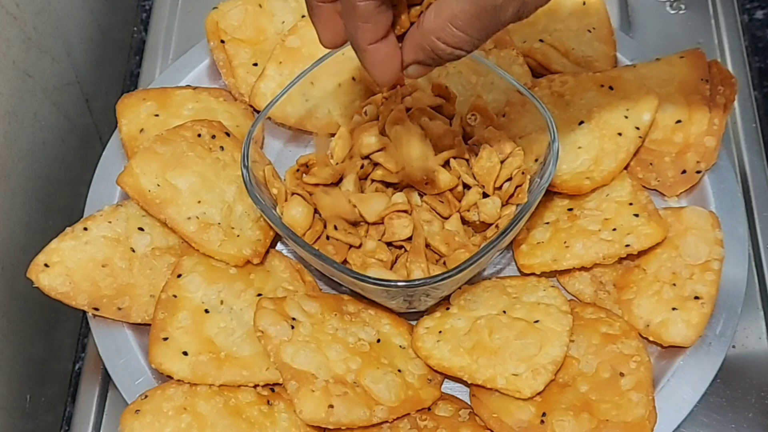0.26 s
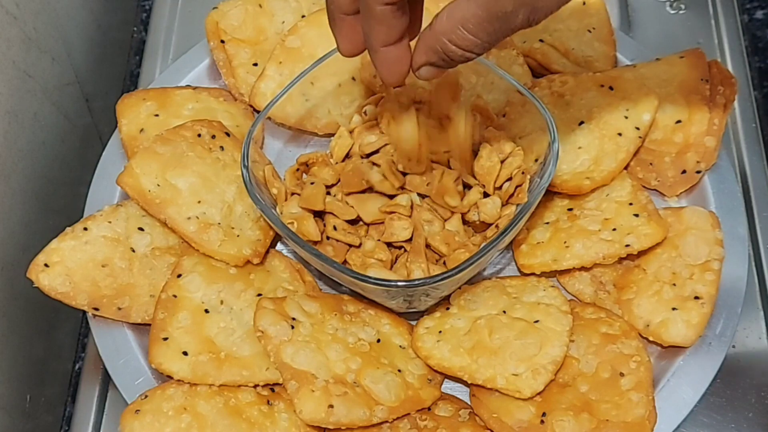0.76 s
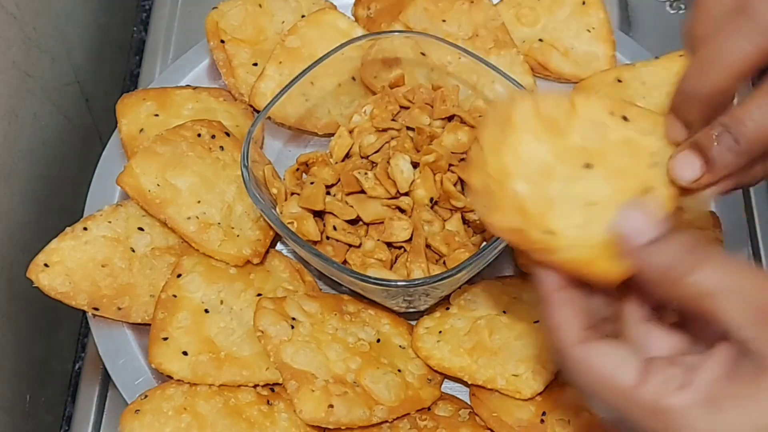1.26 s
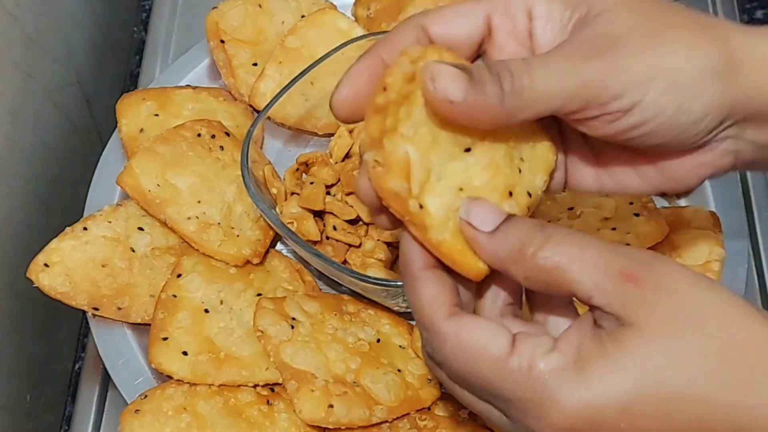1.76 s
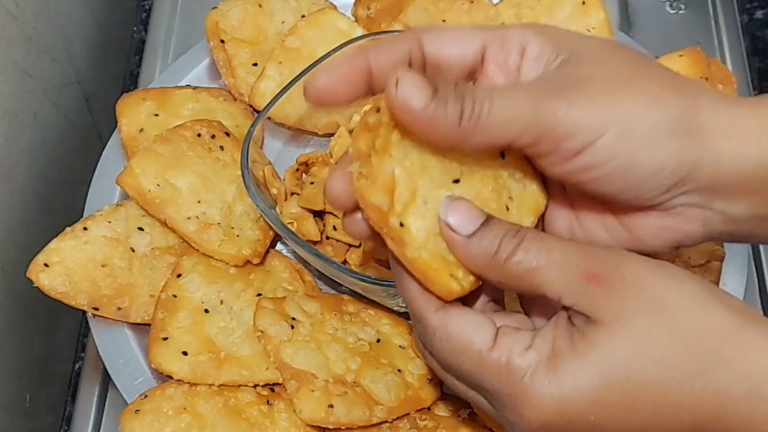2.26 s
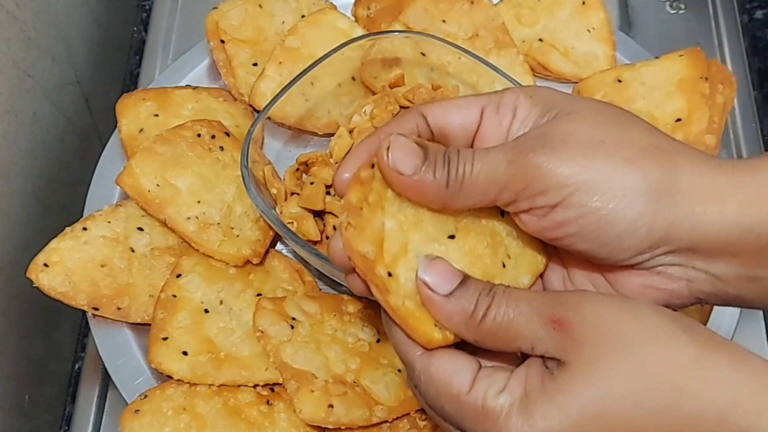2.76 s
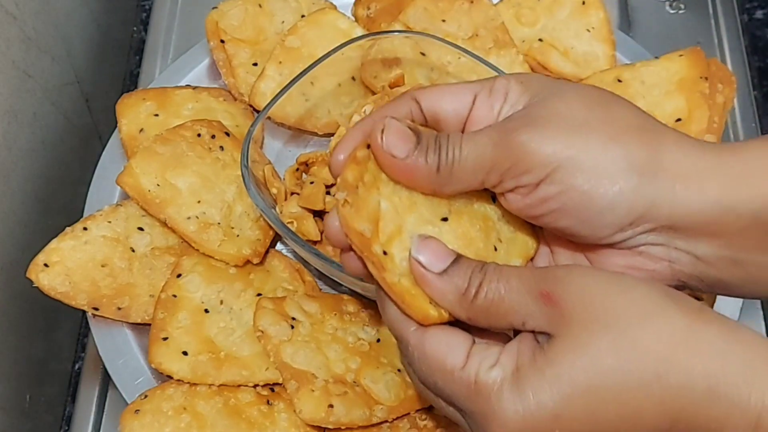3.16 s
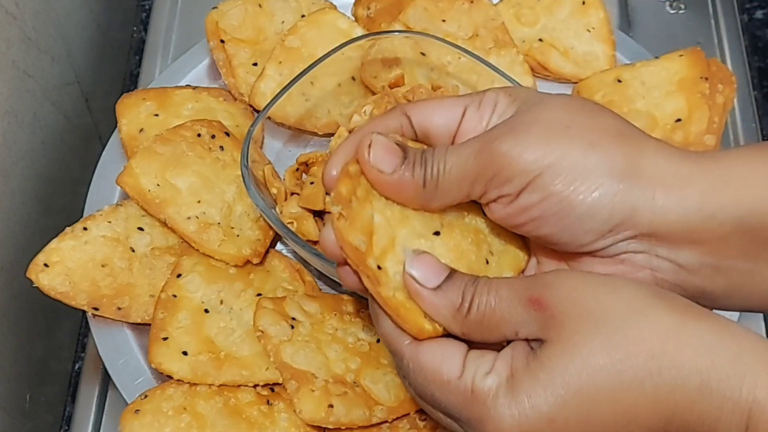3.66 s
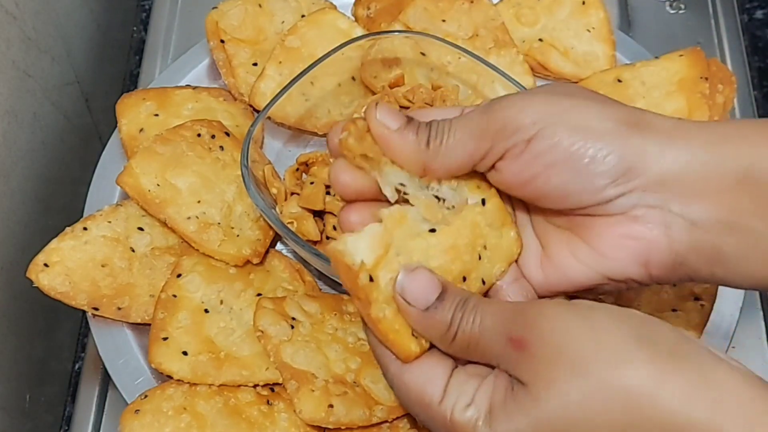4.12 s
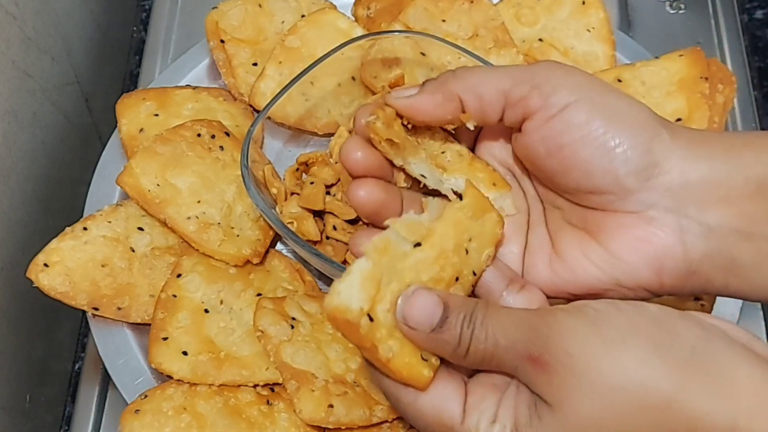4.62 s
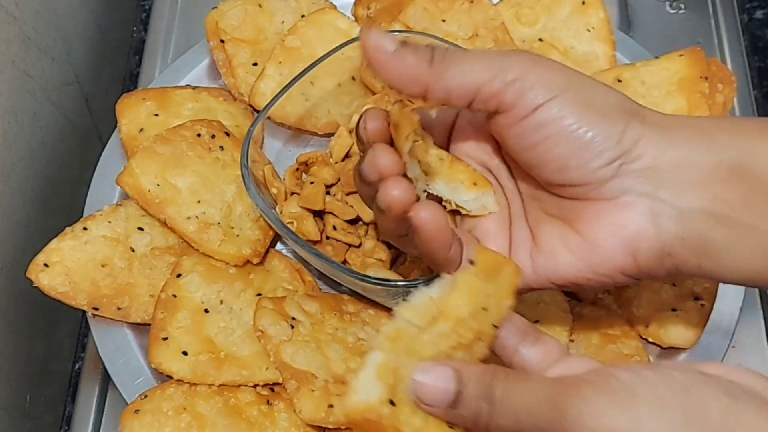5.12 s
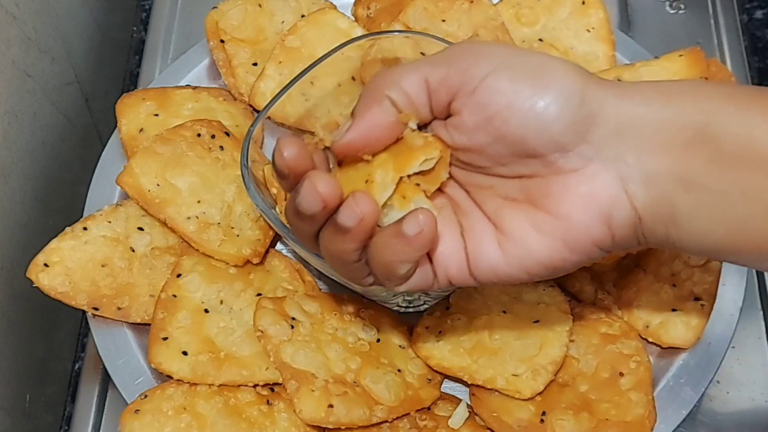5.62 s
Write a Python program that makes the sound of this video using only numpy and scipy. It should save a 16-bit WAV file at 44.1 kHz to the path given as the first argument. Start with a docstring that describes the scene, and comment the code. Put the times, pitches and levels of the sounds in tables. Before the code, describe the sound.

Heard up close in a small, slightly reverberant kitchen, dry snack pieces sprinkle into a glass bowl with bright little clinks. A faint rasp of fingers on crust follows. Then a fried cracker starts to crackle and breaks with three loud snaps, ending in soft, gritty crumbling and the light tap of a falling bit. A low rumble and faint appliance hum lie underneath.

```python
"""A glass bowl clinks as crisp fried snacks patter into it, each impact exciting its normal modes.
Two hands then rub a flaky cracker (stick-slip friction) and bend it until it snaps in three big
cracks (brittle fracture); one fist crumbles a piece, and a bit drops on the heap.
A close stereo microphone hears this in a small, hard, reverberant kitchen over a low rumble."""
import sys
import numpy as np
from scipy import signal
from scipy.fft import rfft, irfft, next_fast_len
from scipy.io import wavfile
from scipy.ndimage import uniform_filter1d, map_coordinates

SR = 44100
rng = np.random.default_rng(int(sys.argv[2]) if len(sys.argv) > 2 else 0)


def unload_audio(sound):
    """Save the sound as a 16-bit wav file, at the path given as the first command line argument."""
    columns = np.transpose(np.atleast_2d(sound))
    # keep every value between -1 and 1, then stretch to whole-number steps
    steps = np.round(np.clip(columns, -1, 1) * 32767)
    wavfile.write(sys.argv[1], SR, steps.astype(np.int16))


N = 259605

# heavily damped modes of the cracker: f/Hz, bandwidth/Hz, level/dB
CRACKER_MODES = [(1424, 590, -8), (2390, 420, 4.5), (3730, 600, -1.5)]
# spectrum of flying grit: f/Hz, level/dB
GRIT_SPECTRUM = [(1500, -35), (3200, -15), (5000, 5), (7500, 0), (11000, 0.5), (15500, -0.5)]
def fracture(snap_db, grit_db, run_ms):
    """Brittle fracture: a crack crosses the layers in tiny jerks that ring the cracker and spit grit."""
    t = np.arange(SR // 50) / SR
    run_s = run_ms / 1000
    stress = amp(-5 * t / run_s - 60 * np.maximum(t - run_s, 0) / .005)
    jerks = (stress + amp(-20 - 60 * t / .03)) * amp(2.5 * rng.standard_normal(len(t)))
    # quiet, gritty breaks are small flakes, which ring up to about an octave higher
    smallness = max(-snap_db - 17.5, 0) / 60 + max(grit_db - snap_db - 1.5, 0) / 16
    shift = 2 ** (min(smallness, 1) + rng.normal(0, 0.11))
    snap = resonate(jerks * stereo_noise(len(t), alike=0.91), CRACKER_MODES, shift)
    bass_cut = signal.butter(2, 850 * shift, "high", fs=SR, output="sos")  # a thin flake sheds no bass
    snap = unit(signal.sosfilt(bass_cut, snap))
    grit = coloured(jerks * stereo_noise(len(t), alike=0.082), GRIT_SPECTRUM)
    energy_scale = np.sqrt(SR / 1000 / len(t))  # levels are the burst's energy as rms over 1 ms
    return energy_scale * (amp(snap_db) * snap + amp(grit_db) * grit)


# distinct fractures and dry contacts: t/s, snap level/dB, grit level/dB, run time/ms
CRACKS = [(0.0532, -28, -22, 1.9), (0.1735, -36.5, -32, 0.87), (0.1827, -26.5, -24.5, 0.8),
          (0.2681, -37, -23, 1.5), (0.5236, -52, -44, 1.4), (0.638, -50, -42, 1.6),
          (0.6775, -34, -28.5, 1.5), (0.6813, -33.5, -28.5, 1.5), (0.7132, -34, -27.5, 1.2),
          (0.7396, -37.5, -28.5, 1.1), (0.7553, -29, -22.5, 1.5), (2.5416, -59, -38.5, 1.3),
          (2.5547, -45, -41.5, 1.2), (2.6804, -60, -46.5, 1.2), (2.7433, -41, -37.5, 1.2),
          (2.9106, -51.5, -38, 1.2), (2.9754, -59, -40, 1.4), (2.9796, -35, -23, 0.6),
          (3.0016, -49.5, -27.5, 1.5), (3.0068, -23.5, -18, 1.7), (3.011, -10, -11.5, 4.5),
          (3.1478, -21, -29, 1.2), (3.156, -26, -28.5, 1.2), (3.1973, -28, -33.5, 1.4),
          (3.3203, -48.5, -29, 1.5), (3.409, -37.5, -42.5, 2.3), (3.4695, -27, -23.5, 0.93),
          (3.5314, -26, -26.5, 2.5), (3.5652, -7, -10, 3.0), (3.5753, -18, -15.5, 5.9),
          (3.6054, -22.5, -18, 0.8), (3.6816, -6, -6, 6.7), (3.7149, -19, -25, 1.5),
          (3.7364, -18, -28.5, 0.57), (3.838, -23.5, -35.5, 0.99), (3.864, -27.5, -25.5, 1.8),
          (3.9779, -52.5, -40, 1.2), (4.7967, -71, -42.5, 1.2), (4.8302, -62.5, -40, 4.0),
          (5.06, -37, -44.5, 4.0), (5.379, -39.5, -31.5, 1), (5.4055, -42.5, -30, 1.2),
          (5.6458, -37.5, -34.5, 5.4), (5.7086, -40.5, -30, 1.2), (5.797, -35, -29, 1.2),
          (5.8409, -27.5, -18.5, 5.5), (5.8644, -49, -29.5, 1.2)]
def cracks():
    """Sudden release of elastic energy radiates a transient, from dry taps to the three big breaks."""
    out = np.zeros((2, N))
    for start, snap_db, grit_db, run_ms in CRACKS:
        add(out, start, fracture(snap_db, grit_db, run_ms))
    return out


# pushes that bend the cracker: t/s, rise/s, hold/s, crunch level/dB, grit level/dB
BENDS = [(2.555, 0.1, 0.015, -65.5, -57.5), (2.682, 0.039, 0.02, -65, -59.5),
         (2.745, 0.05, 0.04, -64.5, -63.5), (2.885, 0.07, 0.015, -55.5, -53.5),
         (3.0, 0.04, 0.07, -51.5, -47.5), (3.165, 0.021, 0.03, -49, -50), (3.33, 0.06, 0.012, -52, -53.5),
         (3.41, 0.06, 0.02, -57, -62.5), (3.53, 0.1, 0.08, -41.5, -40.5), (3.705, 0.039, 0.038, -34.5, -37),
         (3.85, 0.046, 0.025, -43, -42), (4.04, 0.042, 0.03, -53.5, -56), (4.18, 0.1, 0.024, -65.5, -63),
         (4.285, 0.035, 0.005, -75, -67)]
# spectrum of yielding flakes: f/Hz, level/dB
CRUNCH_SPECTRUM = [(500, -20.5), (1200, -11), (2400, 2), (3800, 1.5), (5500, -19), (9000, -32)]
def bending():
    """Acoustic emission: flakes give way under bending stress. Returns the sound and both envelopes."""
    crunch_gain = envelope(BENDS, fall_db_per_s=233)
    grit_gain = envelope(BENDS, fall_db_per_s=167.5, level_column=1)
    crunch = crunch_gain * coloured(grains(per_s=1500, spread_db=2.5, alike=0.89), CRUNCH_SPECTRUM)
    grit = grit_gain * coloured(grains(per_s=1400, spread_db=2.0, alike=0.15), GRIT_SPECTRUM)
    return crunch + grit, crunch_gain, grit_gain


# squeezes of the closing fist: t/s, rise/s, hold/s, level/dB
SQUEEZES = [(4.655, 0.04, 0.01, -56), (4.714, 0.023, 0.0043, -62), (4.835, 0.03, 0.0074, -61),
            (5.21, 0.15, 0.031, -52.5), (5.4, 0.18, 0.039, -49), (5.655, 0.097, 0.023, -52),
            (5.735, 0.056, 0.02, -50.5), (5.81, 0.08, 0.08, -49.5)]
# spectrum of fine crumbs: f/Hz, level/dB
CRUMB_SPECTRUM = [(880, -17), (1500, -14.5), (2040, -22), (2610, -3.5), (3090, -3.5), (4420, -7),
                  (6060, -2.5), (9370, -8), (15100, -4.5), (16000, -6.5)]
def crumbling():
    """Compression grinds crumbs into a dense train of impulses. Returns the sound and its envelope."""
    gain = envelope(SQUEEZES, fall_db_per_s=145.5)
    return gain * coloured(grains(per_s=1700, spread_db=2.0, alike=0.22), CRUMB_SPECTRUM), gain


def chips(crunch_gain, grit_gain, per_s=23, spread_db=2.5):
    """A Poisson process: small flakes break off by chance, their levels following the two envelopes."""
    out = np.zeros((2, N))
    onsets = np.flatnonzero(rng.random(N) < per_s / SR)
    for i, luck_db in zip(onsets, spread_db * rng.standard_normal(N)[onsets]):
        snap_db, grit_db = 20 * np.log10([crunch_gain[i] + 1e-6, grit_gain[i] + 1e-6]) + luck_db
        if grit_db > -72:
            add(out, i / SR, fracture(snap_db + 11, grit_db + 13, run_ms=1.2))
    return out


# finger strokes: t/s, rise/s, hold/s, level/dB
STROKES = [(1.222, 0.018, 0.015, -51), (1.245, 0.015, 0.0034, -44), (1.318, 0.006, 0.002, -59),
           (1.65, 0.012, 0.0051, -64.5), (1.775, 0.053, 0.043, -61), (1.865, 0.06, 0.036, -54),
           (2.02, 0.23, 0.1, -67.5), (2.147, 0.04, 0.014, -52), (2.246, 0.014, 0.025, -53),
           (2.31, 0.06, 0.04, -63.5)]
# spectrum of the rubbed crust: f/Hz, level/dB
CRUST_SPECTRUM = [(710, -60), (1200, -17), (1540, -17), (1750, -12.5), (2230, -13.5), (3830, 2), (6870, -1),
                  (7490, -7), (14000, -14.5), (16000, -17)]
def rubbing():
    """Friction noise: skin rasps over the rough crust in thousands of tiny slips a second."""
    slips = grains(per_s=7600, spread_db=3.5, alike=0.28)
    return envelope(STROKES, fall_db_per_s=344) * coloured(slips, CRUST_SPECTRUM)


# jolts of the hands: t/s, level/dB
JOLTS = [(3.011, -47), (3.567, -53.5), (3.683, -53)]
def hand_jolts(t60_s=0.38):
    """Recoil: the hands jolt softly as the cracker gives, each time a decaying burst of noise."""
    out, t = np.zeros((2, N)), np.arange(SR // 4) / SR
    spectrum = [(100, -15.5), (320, -3.5), (490, -10.5), (850, 3.5), (2500, -18.5), (6000, -30.5)]
    for start, db in JOLTS:
        push = coloured(stereo_noise(len(t), alike=.9), spectrum)
        add(out, start, amp(db - 60 * t / t60_s) * push)
    return out


# normal modes of the glass bowl: f/Hz, level/dB, T60/s
BOWL_MODES = [(1926, -1, 0.32), (3258, 0.5, 0.21), (4744, 1, 0.21), (5290, 0, 0.15), (7180, 2.5, 0.19),
              (8468, -12.5, 0.08), (10200, -5, 0.15), (10700, -19, .18), (12710, -14, .22),
              (13270, -15.5, 0.14), (13800, -13, 0.12), (15200, -17, .17)]
# impacts, whose spot weights the modes: t/s, level/dB of modes 1, 2, 3, 4, level/dB of all higher modes
CLINKS = [(0.0, -42.5, -47, -37, -34.5, -48.5), (0.0539, -33.5, -28, -46.5, -31, -66),
          (0.23, -47.5, -30.5, -47.5, -58.5, -53), (0.288, -38.5, -22.5, -25, -43.5, -34.5),
          (0.3064, -32.5, -26.5, -45, -29, -46.5), (0.372, -43, -38, -44.5, -42, -47),
          (0.724, -53, -35, -44, -38, -59), (0.78, -48, -45, -41.5, -52, -55),
          (0.829, -53, -47, -53, -60, -68)]
def bowl(damped_share=0.35, damping_s=0.022):
    """Modal vibration: struck glass rings, and the heap pressing on it soaks up a share of each ring."""
    out, t = np.zeros((2, N)), np.arange(SR // 2) / SR
    attack = 1 - np.exp(-t / 0.00048)
    shape = attack * (1 - damped_share + damped_share * np.exp(-t / damping_s))
    for k, (hz, db, t60) in enumerate(BOWL_MODES):
        swing = np.zeros(N)
        for start, *levels in CLINKS:
            strike_db = levels[min(k, len(levels) - 1)]
            add(swing, start, amp(db + strike_db - 60 * t / t60) * shape)
        ringing = np.flatnonzero(swing)
        waver = np.array([wobble(per_s=45)[ringing] for port in range(2)])  # differs left and right
        phase = 2 * np.pi * hz * ringing / SR + .8 * waver[::-1]
        out[:, ringing] += swing[ringing] * amp(2.4 * waver) * np.sin(phase)
    return out * amp([[-1], [2]])  # louder on the right


# handfuls landing on the heap: t/s, rise/s, hold/s, patter level/dB, thud level/dB
HANDFULS = [(0.0, 0.02, 0.03, -46.5, -60.5), (0.06, 0.018, 0.012, -41, -51.5),
            (0.186, 0.038, 0.049, -47.5, -58.5), (0.275, 0.066, 0.073, -43.5, -55),
            (0.685, 0.055, 0.04, -45.5, -48.5), (0.745, 0.054, 0.041, -37.5, -44.5)]
# spectrum of the struck heap: f/Hz, level/dB
HEAP_SPECTRUM = [(290, -40), (500, -15.5), (1090, -15.5), (1950, -4.5), (2850, -9), (3340, 1), (3980, -9.5),
                 (5390, -9), (5880, -9), (16000, -17.5)]
# modes of the loaded plate under the bowl: f/Hz, bandwidth/Hz, level/dB
PLATE_MODES = [(340.6, 56, -4.5), (458.4, 30, -2), (744, 130, -16)]
def sprinkling():
    """Impact noise: pieces patter on the heap and drive the plate into forced vibration."""
    patter_gain = envelope(HANDFULS, fall_db_per_s=272)
    thud_gain = envelope(HANDFULS, fall_db_per_s=217.5, level_column=1)
    patter = coloured(grains(per_s=1800, spread_db=2.6, alike=.4), HEAP_SPECTRUM)
    thud = resonate(grains(per_s=600, spread_db=1.5, alike=.85), PLATE_MODES)
    return patter_gain * patter + thud_gain * thud


# a broken bit landing: t/s, plate level/dB, rattle level/dB
DROPS = [(5.061, -50.5, -54)]
def falling_bit():
    """Exponential decay after an impact: a falling bit knocks the plate and stirs the heap."""
    out, t = np.zeros((2, N)), np.arange(SR // 2) / SR
    for start, plate_db, rattle_db in DROPS:
        knock = resonate(stereo_noise(len(t), alike=0.48), PLATE_MODES)
        rattle = coloured(stereo_noise(len(t), alike=0.7), CRUNCH_SPECTRUM)
        add(out, start, knock * amp(plate_db - 60 * t / 0.44) + rattle * amp(rattle_db - 60 * t / 0.43))
    return out


# course of the background rumble: t/s, level/dB
RUMBLE_LEVELS = [(0.0, -46), (0.18, -56.5), (0.39, -50.5), (1.0, -55.5), (1.13, -66.5), (1.34, -62),
                 (3.01, -58.5), (3.86, -54.5), (4.21, -62.5), (5.14, -56), (5.78, -55.5), (5.88, -49)]
# its spectrum: f/Hz, level/dB
RUMBLE_SPECTRUM = [(20, -52.5), (35, -34), (50, -18.5), (62, 2), (80, -6), (115, 1), (160, -7.5), (200, -7),
                   (260, -14.5), (400, -21), (700, -45), (1500, -78.5)]
def rumble(waver_db=1.14):
    """Amplitude modulation: low-frequency noise drifts and wavers in level."""
    db = np.interp(np.arange(N) / SR, *np.transpose(RUMBLE_LEVELS)) + waver_db * wobble(per_s=13)
    return amp(db) * coloured(stereo_noise(N, alike=.85), RUMBLE_SPECTRUM)


# partials of an appliance: f/Hz, level/dB
HUM_PARTIALS = [(63.5, -68.5), (101, -70.5), (121, -66)]
def appliance_hum():
    """Superposition: steady sinusoids of random phase add up to a hum."""
    t = np.arange(N) / SR
    return sum(amp(db) * np.sin(2 * np.pi * (hz * t + rng.random())) for hz, db in HUM_PARTIALS)


# spectrum of the background hiss: f/Hz, level/dB
HISS_SPECTRUM = [(200, 2), (500, -3), (900, -4.5), (2000, -15.5), (5000, -13), (16000, -19)]
def hiss():
    """Broadband noise, faint and almost incoherent between the channels."""
    return amp(-67) * coloured(stereo_noise(N, alike=0.034), HISS_SPECTRUM)


# faint background tones: start t/s, end t/s, f/Hz, bandwidth/Hz, level/dB
THIN_TONES = [(1.799, 3.003, 1726, 172, -71), (1.8, 2.35, 723, 120, -74.5), (2.1, 3.0, 832, 129, -70.5),
              (2.202, 3.1, 3170, 59.7, -77), (3.9, 5.901, 3188, 74.5, -68),
              (4.152, 5.898, 847, 242.3, -74.5), (4.7, 6.105, 632, 170, -65.5)]
def thin_tones():
    """Narrow-band noise is heard as pitch: thin tones swell and fade."""
    out = np.zeros((2, N))
    for start, end, hz, width_hz, db in THIN_TONES:
        swell = signal.windows.tukey(round((end - start) * SR), .6)
        noise = stereo_noise(len(swell), alike=0.061)
        tone = filtered(noise, lambda f: 1 / (1 + (2 * (f - hz) / width_hz) ** 2))
        add(out, start, amp(db) * swell * unit(tone))
    return out


# reverberation time of the kitchen: f/Hz, T60/s
KITCHEN_T60 = [(200, 0.28), (2500, 0.42), (7000, 0.31), (15000, 0.22)]
def kitchen(x):
    """Reverberation: hard walls return a diffuse tail, different at each microphone port."""
    hz, t, spectra = signal.stft(rng.standard_normal((2, SR * 3 // 5)), SR, nperseg=256)
    decay = amp(-60 * t / along(KITCHEN_T60, hz)[:, None])
    tail = signal.istft(spectra * decay, SR, nperseg=256)[1]
    age = np.arange(tail.shape[1]) / SR
    tail *= (1 - np.exp(-age / 0.00061)) * (1 + 1.2 * np.exp(-age / .02))  # the counter answers first
    return signal.fftconvolve(x, tail / np.linalg.norm(tail[0]), axes=1)[:, :N]


def amp(db):
    """Amplitude ratio of a level in dB."""
    return 10 ** (np.asarray(db) / 20)


def unit(x):
    """Normalisation to rms 1."""
    return x / np.sqrt(np.mean(x ** 2) + 1e-20)


def along(points, hz):
    """Interpolation of (f/Hz, value) points on a logarithmic frequency axis."""
    f, values = np.transpose(points)
    return np.interp(np.log(hz + 1), np.log(f), values)


def add(track, start, sound):
    """Superposition of a sound on a track, from start/s."""
    part = track[..., max(round(start * SR), 0):][..., :sound.shape[-1]]
    part += sound[..., :part.shape[-1]]


def filtered(x, response):
    """Linear filtering: the spectrum of x times a complex frequency response."""
    n = x.shape[-1]
    padded = next_fast_len(n + min(n, SR // 2))
    return irfft(rfft(x, padded) * response(np.fft.rfftfreq(padded, 1 / SR)), padded)[..., :n]


def coloured(x, spectrum):
    """Spectral shaping by (f/Hz, level/dB) points, at rms 1."""
    return unit(filtered(x, lambda hz: amp(along(spectrum, hz))))


def resonate(x, modes, shift=1):
    """Resonance in (f/Hz, bandwidth/Hz, level/dB) modes of alternating sign, at rms 1."""
    def mode(f, centre, width):
        resonance = 1j * f * width / (centre ** 2 - f ** 2 + 1j * f * width)
        return resonance * 1j * f / (centre + 1j * f)  # a small body radiates little below its modes
    return unit(filtered(x, lambda f: sum((-1) ** k * amp(db) * mode(f / shift, centre, width)
                                          for k, (centre, width, db) in enumerate(modes))))


def stereo_noise(size, alike):
    """Partial coherence: two white noises share the fraction alike of their power."""
    noise = rng.standard_normal((3, size))
    return np.sqrt(alike) * noise[0] + np.sqrt(1 - alike) * noise[1:]


def grains(per_s, spread_db, alike):
    """Shot noise: random impulses of uneven size at a steady mean level."""
    hits = rng.random(N) < per_s / SR
    sizes = hits * amp(spread_db * np.minimum(rng.exponential(size=N), 4))
    power = np.abs(uniform_filter1d(sizes ** 2, size=SR // 25))
    return stereo_noise(N, alike) * sizes / np.sqrt(power + 1e-6)


def wobble(per_s):
    """Slow modulation: straight lines between random knots."""
    knots = rng.standard_normal(int(N * per_s / SR) + 4)
    return map_coordinates(knots, [np.arange(N) * per_s / SR], order=1)


def envelope(gestures, fall_db_per_s, level_column=0, rise_db=21):
    """Incoherent addition: gestures swell up to their time t, hold and die away; their powers add."""
    t, power = np.arange(N) / SR, np.zeros(N)
    for peak, rise, hold, *levels in gestures:
        early, late = np.maximum(peak - t, 0), np.maximum(t - peak - hold, 0)
        db = levels[level_column] - rise_db * early / rise - fall_db_per_s * late
        heard = db > -120
        power[heard] += amp(db[heard]) ** 2
    return np.sqrt(power)


def scene():
    """The sound field is the sum of direct sound, reverberation and background."""
    snaps, glass = cracks(), bowl()
    handling = sprinkling() + rubbing()
    crunch, crunch_gain, grit_gain = bending()
    crumbs, crumb_gain = crumbling()
    handling += crunch + crumbs + chips(crunch_gain, grit_gain + crumb_gain)
    handling += hand_jolts() + falling_bit()
    room = kitchen(amp(-3.0) * snaps + amp(-8.5) * glass + amp(-2.5) * handling)
    background = rumble() + appliance_hum() + hiss() + thin_tones()
    return snaps + glass + handling + room + background


# colour difference of the two microphone ports: f/Hz, left minus right level/dB
PORT_DIFFERENCE = [(60, -6), (125, -8), (250, -1), (700, -3), (1500, -5), (3200, 0), (5000, -4.5),
                   (8000, 1.5), (14000, 3.5)]
def record(dry, top_hz=16100):
    """Frequency response: each port has its own colour, and nothing passes above the band limit."""
    return filtered(dry, lambda hz: amp(np.outer([.5, -.5], along(PORT_DIFFERENCE, hz))) * (hz < top_hz))


dry = scene()
out = record(dry)
unload_audio(out)
```